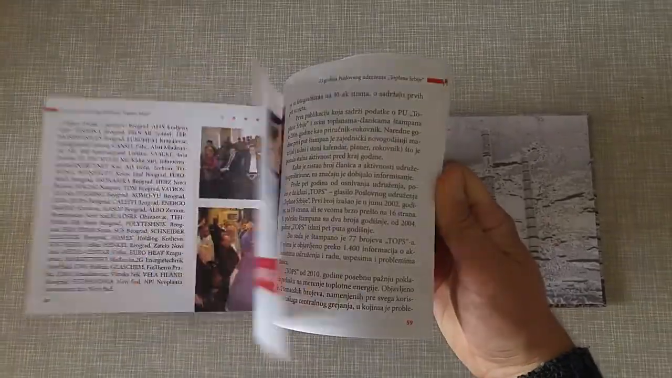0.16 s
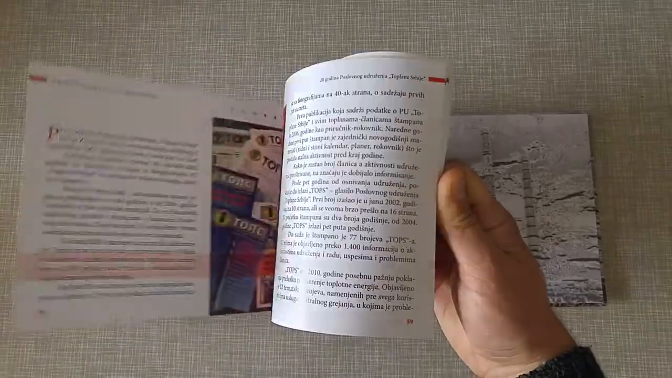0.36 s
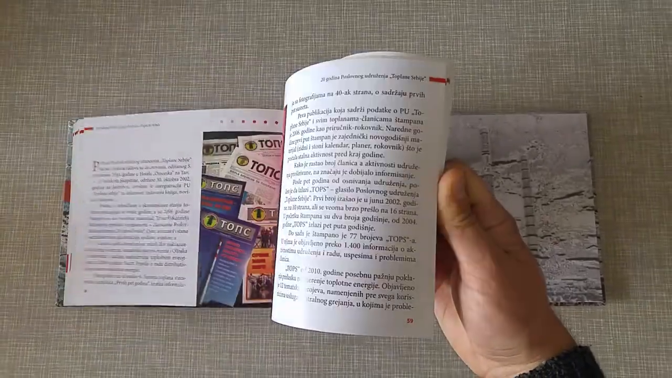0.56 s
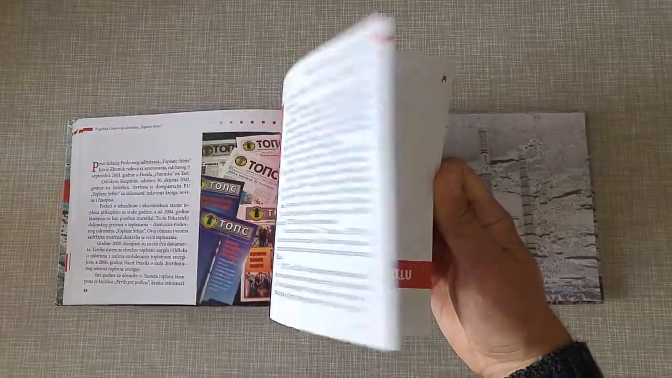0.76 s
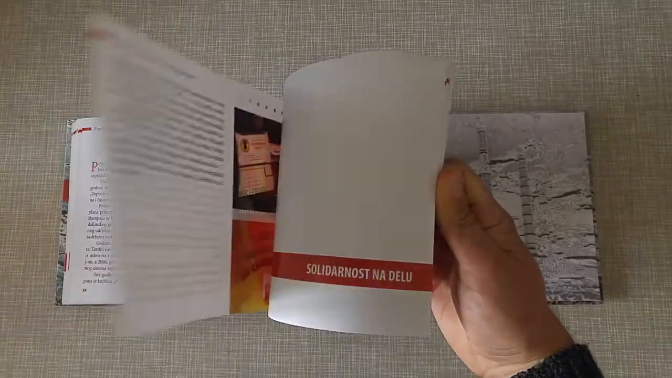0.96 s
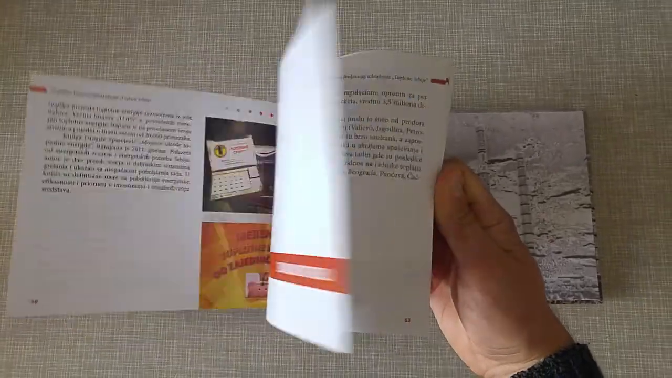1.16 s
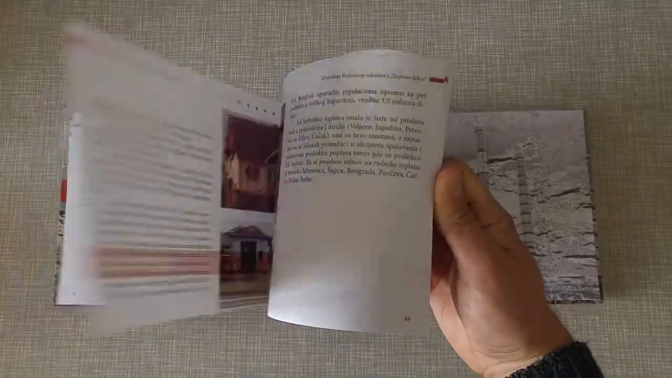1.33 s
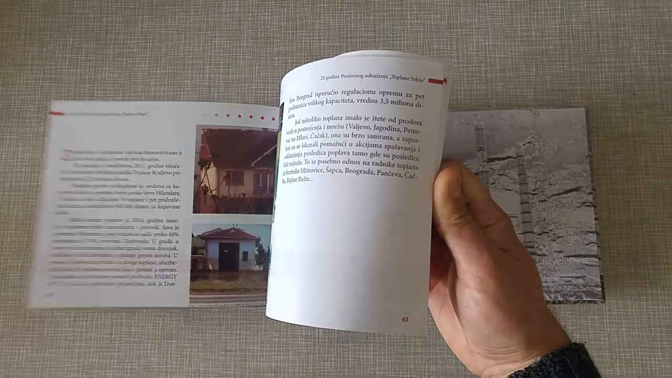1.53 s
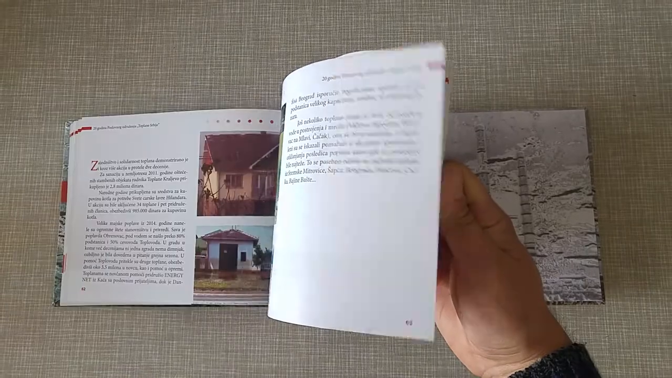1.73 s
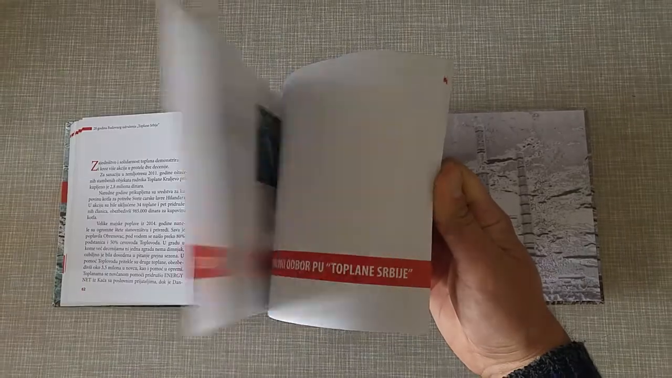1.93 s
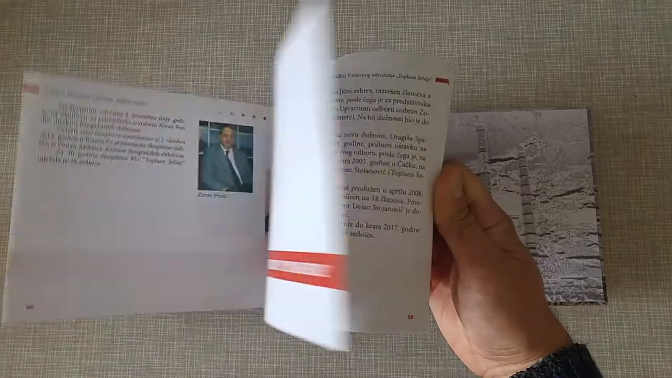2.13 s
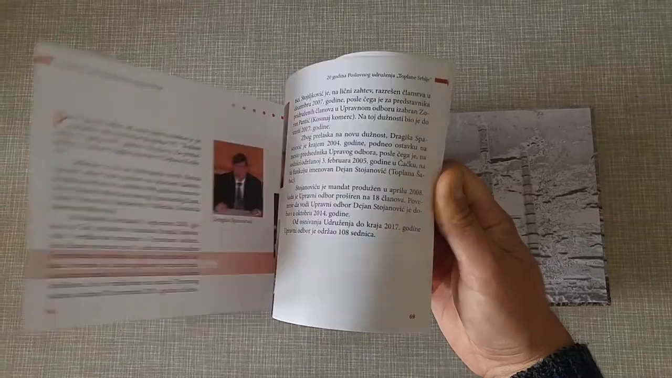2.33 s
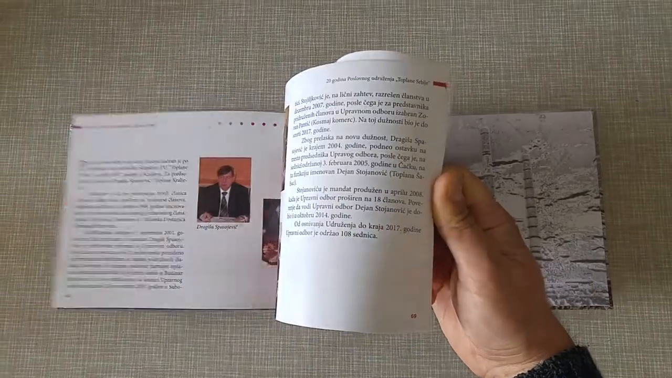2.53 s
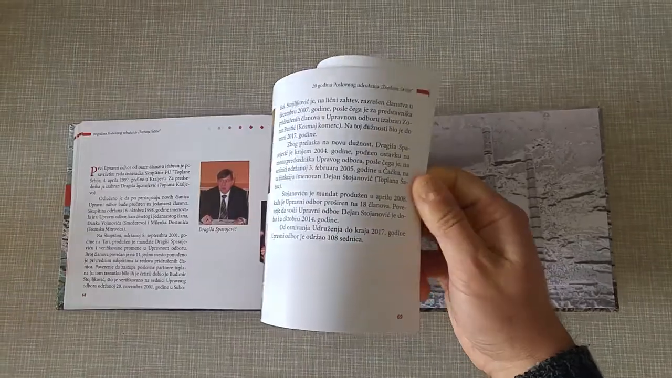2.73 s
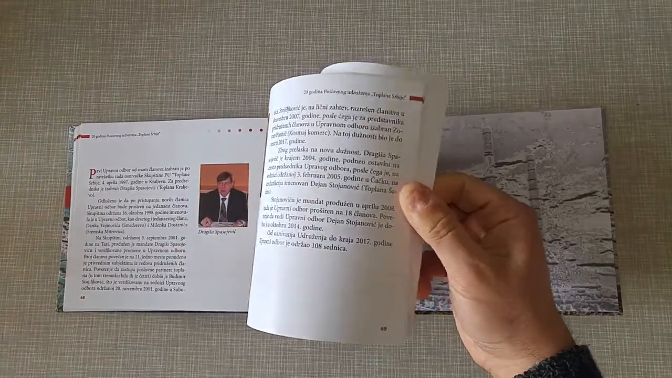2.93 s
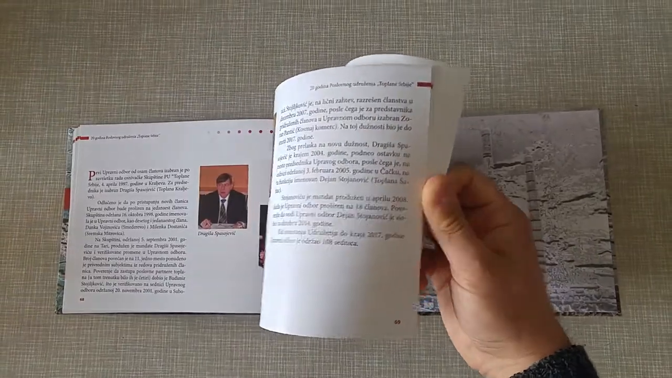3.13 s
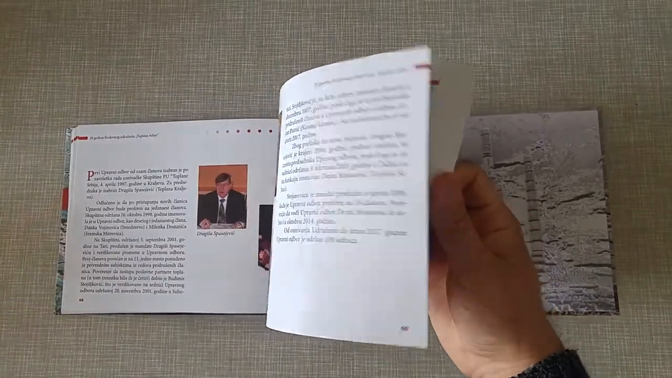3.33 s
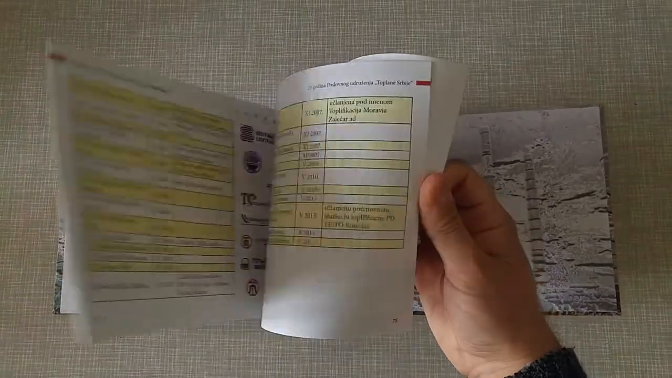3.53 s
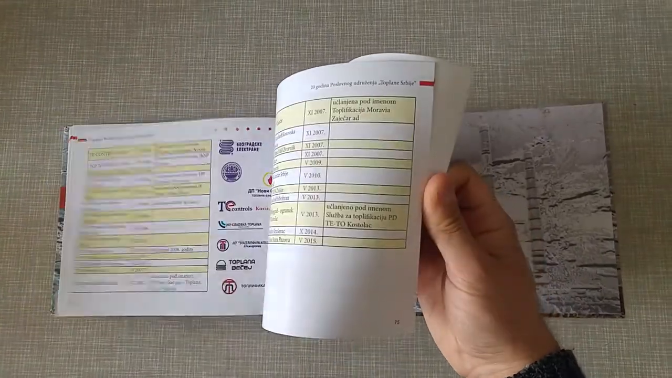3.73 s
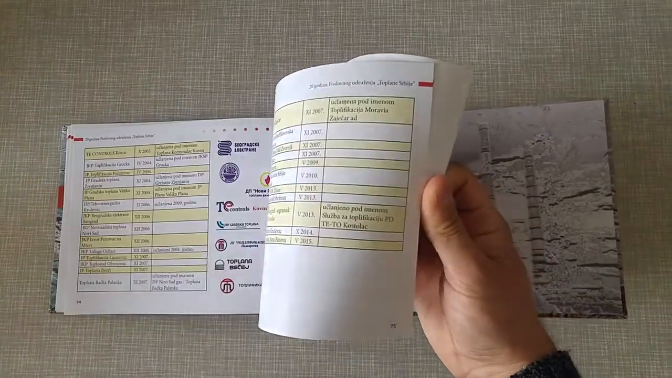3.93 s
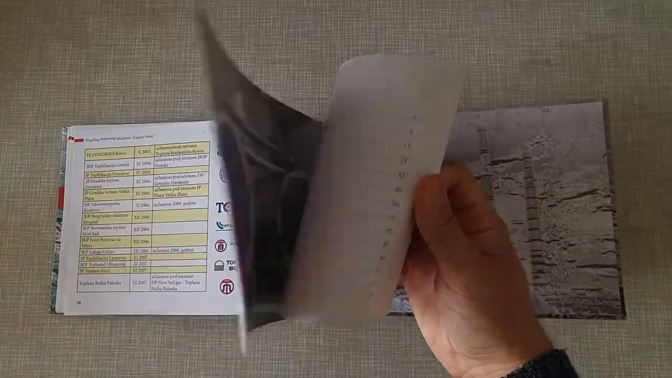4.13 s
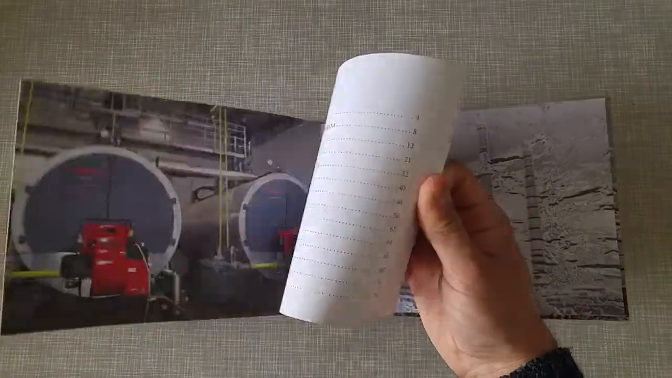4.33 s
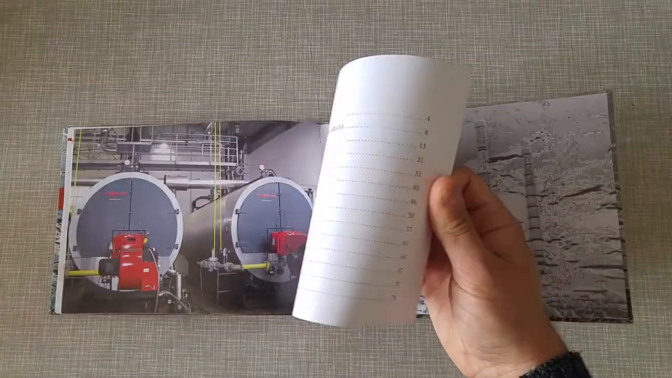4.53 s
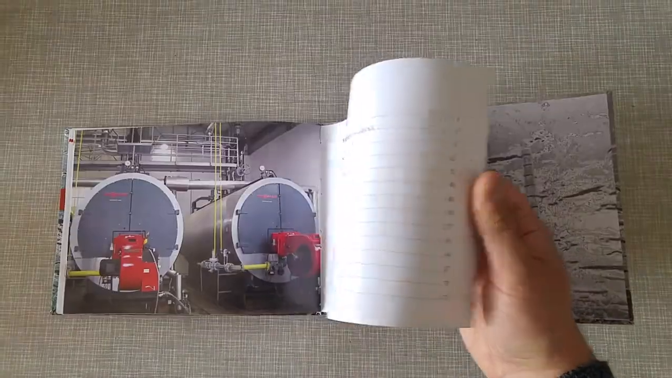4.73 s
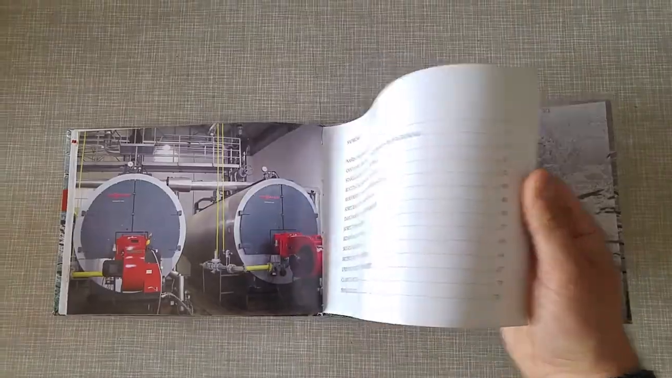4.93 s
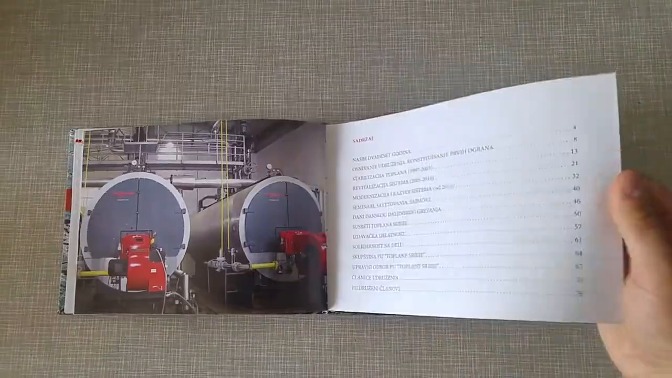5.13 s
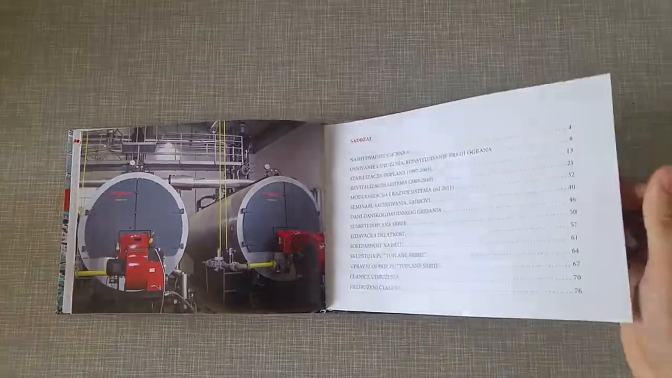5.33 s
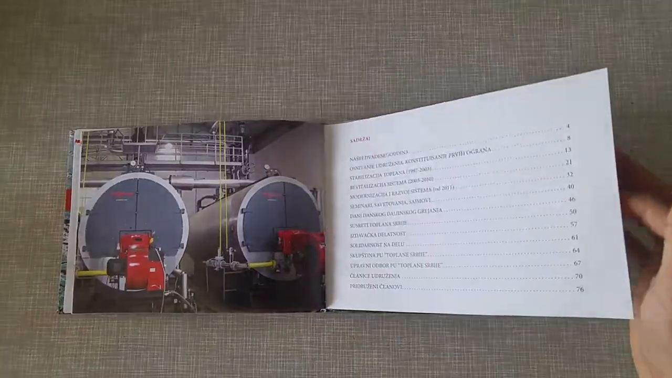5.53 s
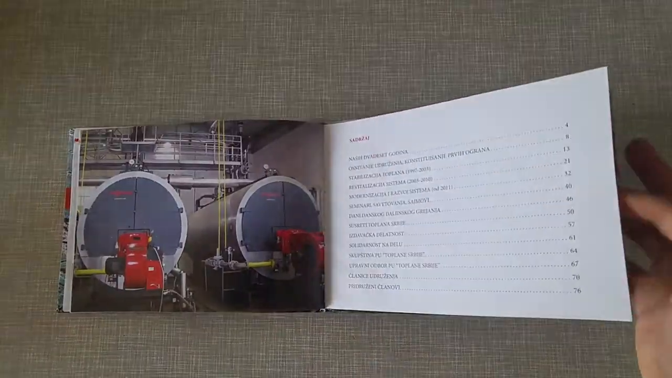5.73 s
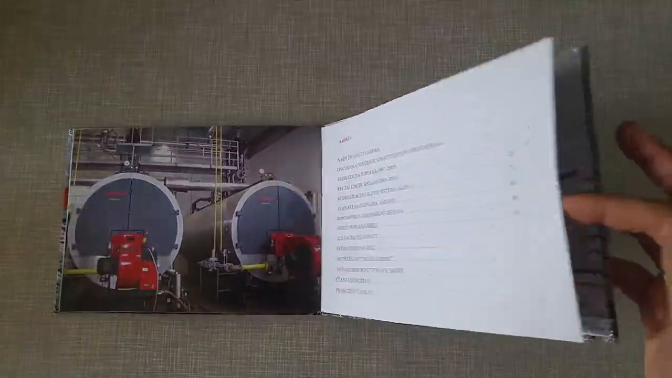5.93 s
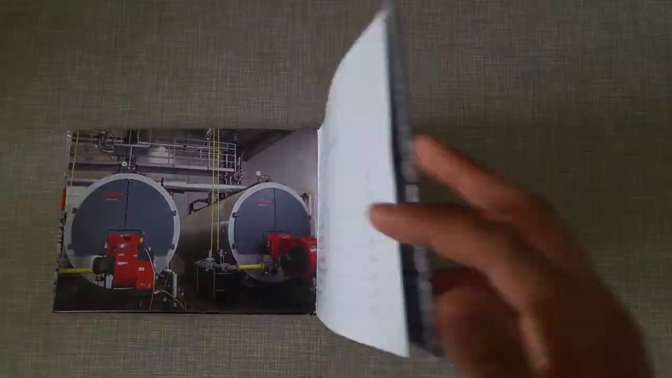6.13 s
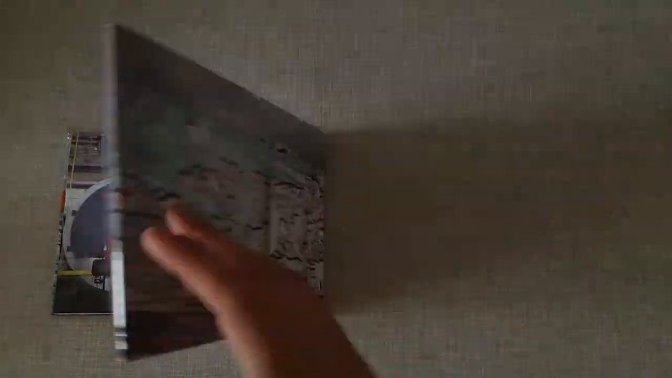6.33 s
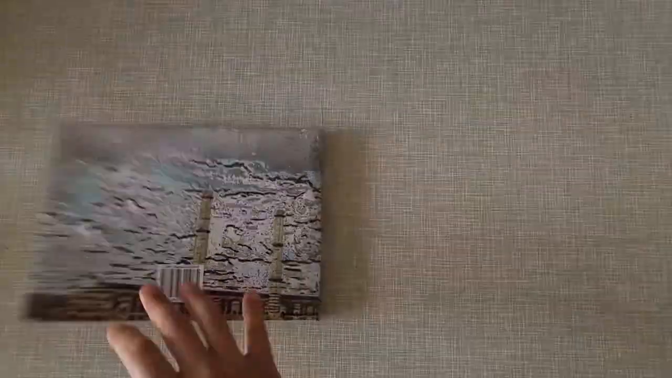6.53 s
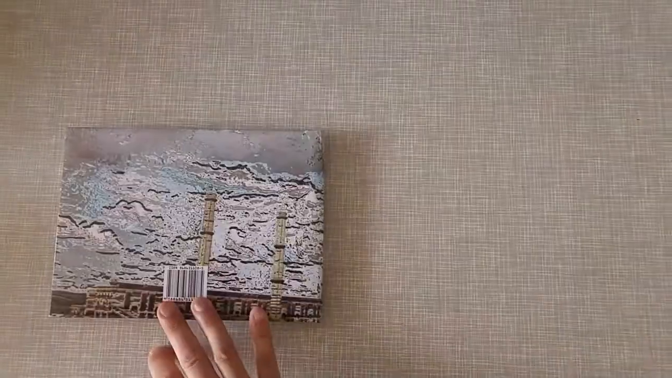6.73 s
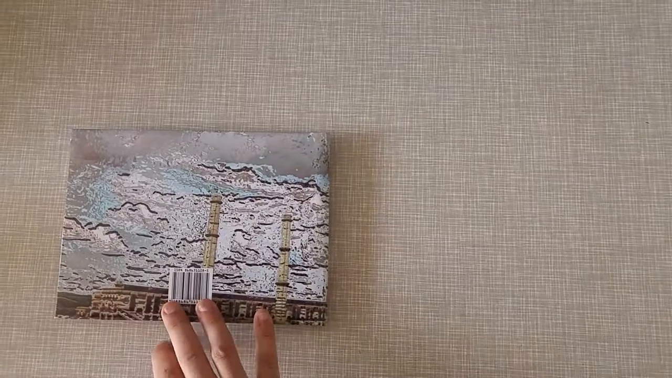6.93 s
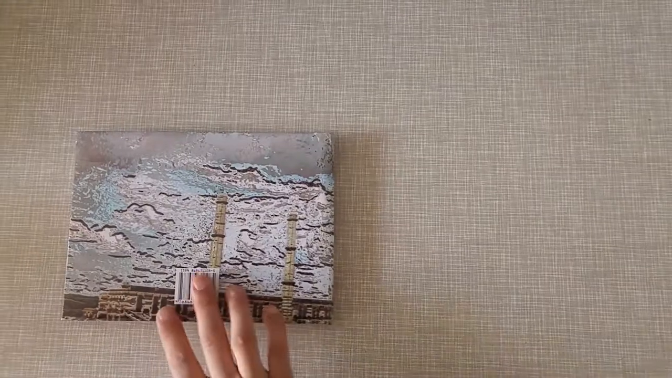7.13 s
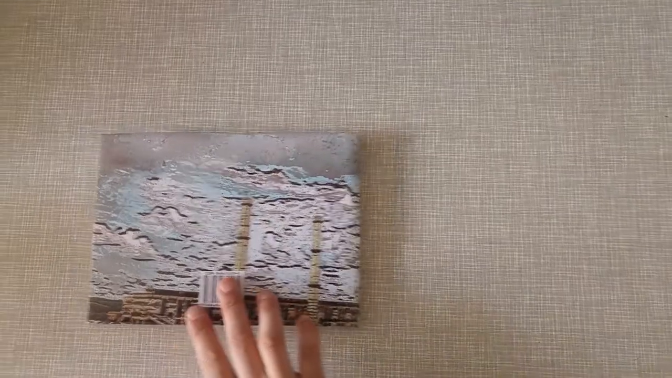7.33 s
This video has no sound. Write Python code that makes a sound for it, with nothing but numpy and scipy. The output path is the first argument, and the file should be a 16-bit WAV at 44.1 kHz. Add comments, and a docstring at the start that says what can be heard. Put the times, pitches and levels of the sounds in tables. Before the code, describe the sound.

A glossy paperback is thumbed through close by, pages hissing, snapping and popping, before its cover slaps shut with a low thud and fingers stroke it.

```python
"""In a small room, a glossy paperback is thumbed through close by on a cloth-covered table.
Page edges snap off the thumb as short noise bursts; buckling sheets pop as damped waves with cracks and flaps.
Grainy noise makes skin slide over paper, soft low noise makes the air waft, and low waves make dull knocks.
At the end the cover slaps shut, the book thuds with a ringing table, and fingers stroke the cover.
Room noise, a wavering hum and very faint ticks lie underneath."""
import sys
import numpy as np
from scipy import signal
from scipy.fft import rfft, irfft, next_fast_len
from scipy.io import wavfile
from scipy.ndimage import uniform_filter1d, map_coordinates

SR = 44100
rng = np.random.default_rng(int(sys.argv[2]) if len(sys.argv) > 2 else 0)


def dump(signal):
    """Clip the signal to [-1, 1] and save it as 16-bit WAV at the path in sys.argv[1]."""
    limited = np.clip(np.atleast_2d(signal).T, -1, 1)
    pcm = np.round(limited * 32767).astype(np.int16)
    wavfile.write(sys.argv[1], SR, pcm)


N = 328986  # length in samples

# Page edges snapping off the thumb: t/s, sizzle level/dB, body level/dB relative to sizzle, fall time/s
PAGE_SNAPS = [(.047, -30, -26, 0.0011), (.726, -32, -20, 0.0024), (1.056, -48.5, 3.5, 0.0021),
              (1.086, -27, -17, 0.0012), (1.117, -44, 20, 0.00096), (1.42, -37.5, 3.5, 0.0014),
              (1.4642, -43, 23, 0.00087), (1.6453, -45.5, 2, 0.0011), (1.745, -44, 3, 0.0012),
              (1.751, -33, -18, 0.0026), (1.788, -54, 11.5, 0.0023), (1.8006, -43.5, -10, 0.0016),
              (1.8084, -34.5, -21, .003), (2.0645, -31.5, -10, .003), (2.932, -39, -16, .004),
              (3.346, -32, -2.5, 0.0027), (3.3547, -29, -12.5, 0.0021), (3.6554, -52, -0.5, .001),
              (3.793, -44.5, 2, 0.0037), (3.8853, -51.5, 4.5, 0.0046), (4.01, -22, -8, .0035),
              (4.0906, -37, -13, 0.0037), (4.2915, -44.5, -21, .0008), (4.4972, -42.5, -1, 0.0038),
              (4.6173, -48.5, -11, 0.00092), (4.692, -35.5, -10.5, 0.0052), (5.2375, -41, 1, .005),
              (5.4196, -47, 1.5, 0.004)]
# Ticks, slap and taps of the stiff cover:
# t/s, sizzle level/dB, body level/dB and air level/dB relative to sizzle, fall time/s
COVER_TAPS = [(5.7705, -46, -3.5, -4.5, 0.0012), (5.815, -44, -30, 6, 0.00054),
              (5.8218, -45.5, -6, 6, 0.0012), (5.8706, -45, -17, 3.5, 0.00084),
              (5.9482, -47.5, -7, 0.5, .0009), (6.0725, -50.5, -7.5, 8, .0008),
              (6.2288, -44, -15, -12.5, .0025), (6.3162, -53.5, -9, 11, 0.0009),
              (6.5013, -48, -25, -3, .0007), (6.5723, -19.5, -26, -13.5, 0.00069),
              (6.6162, -26.5, -36, -12, 0.0014), (6.6216, -33, -22, -4, .0012),
              (7.1165, -41.5, -15, -9, .0009), (7.1565, -44.5, -11, -11.5, .0025)]
# Tone colours of the four parts of a snap: f/Hz, relative level/dB (per Hz)
SIZZLE_COLOUR = [(4000, -21), (5500, -10), (6400, -2), (7200, -1.5), (7900, -26), (10000, -38)]
BODY_COLOUR = [(100, -27.5), (350, -15.5), (500, -20.5), (750, 1.5), (1100, -2.5), (1650, -3.5),
               (2050, -10.5), (2700, -7.5), (4000, -49.5)]
RASP_COLOUR = [(2200, -35), (2950, 2), (3600, 2), (4200, 4), (4900, 7), (5600, 2), (7000, -36.5)]
AIR_COLOUR = [(6500, -30.5), (8400, -3), (10000, -13), (12000, -14), (16000, -22)]
# Part levels are relative to the sizzle; a positive lean is louder on the left
PAGE_RASP_DB, RASP_PER_BODY = -6.5, 0.7  # a fuller page snap also rasps more
PAGE_AIR_DB, PAGE_LEAN_DB = -9, 9.5
COVER_RASP_DB, COVER_LEAN_DB = -1, 11.5
RISE_SHARE = 0.66  # rise time of a snap over its fall time

# Sheets buckling, and in the last row (6.5725 s) the cover slapping shut: t/s, wave peak level/dB, pitch f/Hz,
# crack level/dB and flap level/dB relative to the wave
POPS = [(.061, -40, 902, -8, 10), (.2548, -46, 3180, -10, -20), (0.286, -47.5, 2800, -4, -20),
        (.3127, -41, 1630, -10, -2), (.383, -44.5, 940, -9, 11), (1.062, -35.5, 1100, -13, 4.5),
        (1.076, -37, 750, -20.5, 1), (1.1122, -27.5, 980, -12, -5), (1.1173, -21.5, 810, -5, -6.5),
        (1.268, -36, 900, -9, -23), (1.4655, -12.5, 1250, -1.5, -22.5), (1.4661, -11, 1660, -1, -26),
        (1.468, -21, 760, -12, -7.5), (2.159, -34, 860, -6.5, 6), (2.362, -44.5, 698, -39, -1),
        (3.2885, -15.5, 908, -18.5, -21.5), (3.604, -30, 803, -25, -6), (3.997, -32, 950, 6, 0.5),
        (4.1067, -24.5, 1200, -26, -3), (4.1266, -22.5, 980, -21, -3.5),
        (4.136, -21, 777, -28, -11.5), (4.52, -42, 402, -11, -7), (4.578, -39, 1012, -8, -21),
        (4.693, -33, 932, -18, -5), (4.855, -42.5, 1010, -9, 0), (5.5876, -46.5, 762, 1.5, 9),
        (6.189, -42, 1600, -2, -9), (6.21, -43, 1480, -5, -20.5), (6.231, -41, 1670, -10, -8),
        (6.5725, -24.5, 1360, -13, -34)]
# Tone colours of the crack and the flap: f/Hz, relative level/dB (per Hz)
CRACK_COLOUR = [(250, -51), (700, -13), (1200, 2.5), (1850, 9.5), (2400, -2), (3300, 2.5), (4400, -13.5),
                (6800, -14), (8000, -37), (16000, -45)]
FLAP_COLOUR = [(120, -20.5), (250, -11.5), (390, 6), (500, -15), (680, 3.5), (1000, -4), (1400, -14.5),
               (2500, -43)]
POP_CYCLES, POP_LEAN_DB = 2.2, 9.5  # a pop swells over this many cycles of its pitch
# Room level at the middle pitch, and its change per octave: low buckles light up the room more
POP_ROOM_DB, POP_ROOM_DB_PER_OCTAVE, POP_MIDDLE_HZ = -6, -5.5, 1000

# Skin and paper sliding: t/s at full speed, hold/s, hiss level/dB before the trim in sliding(),
# hollow body level/dB relative to that hiss, attack/s, release/s
SLIDING_STROKES = [(0.049, .01, -49.5, -5, 0.0205, 0.031), (0.363, .01, -55.5, -3, 0.016, 0.045),
                   (0.64, 0.0051, -44, -11.5, 0.0075, .022), (0.702, 0.03, -58, -13.5, .03, 0.062),
                   (1.087, 0.026, -45.5, -10.5, 0.021, .14), (1.442, 0.016, -45, -8.5, 0.058, .1),
                   (1.685, 0.15, -50.5, -16.5, 0.047, .05), (2.054, 0.013, -35, -5, 0.0096, 0.0068),
                   (2.555, 0.066, -37, -7.5, 0.018, .055), (2.787, .008, -52.5, -4, 0.014, .02),
                   (2.873, 0.051, -28.5, -7.5, 0.00089, 0.027), (3.051, 0.011, -41, -5.5, 0.028, 0.068),
                   (3.148, 0.058, -41.5, -3.5, 0.043, .012), (3.24, 0.0086, -42.5, 0, 0.013, 0.026),
                   (3.352, .01, -41, -6.5, .018, .03), (3.439, 0.0047, -36, -11.5, .022, .02),
                   (3.73, 0.085, -52.5, -2, .03, .025), (4.004, 0.0041, -28, -6.5, 0.0096, 0.024),
                   (4.1, 0.0053, -35.5, -2.5, 0.016, 0.031), (4.531, 0.024, -43.5, -1, .022, .02),
                   (4.702, .004, -43, -2, .005, 0.038), (4.935, 0.069, -43.5, -4, 0.04, 0.028),
                   (5.042, .06, -43.5, -11.5, .025, 0.054), (5.178, 0.064, -38.5, -4, 0.0164, 0.013),
                   (5.304, .01, -51.5, 0, 0.03, 0.023), (5.376, 0.039, -47, -5, .01, 0.028),
                   (5.505, .025, -45.5, -5, 0.045, 0.052), (5.791, 0.12, -45.5, -8.5, 0.078, 0.12),
                   (6.071, 0.018, -40, -8.5, 0.016, .024), (6.243, 0.011, -50, -20, 0.061, 0.13),
                   (6.537, 0.0075, -39.5, -14, .028, 0.013), (6.572, .003, -25, -11.5, 0.0036, 0.015),
                   (6.604, .055, -37.5, -9, .008, 0.048), (7.04, 0.07, -39.5, -21.5, 0.005, .05),
                   (7.204, 0.009, -33.5, -17, .015, 0.043), (7.305, 0.046, -30.5, -22, 0.029, .04),
                   (7.391, 0.08, -25.5, -23.5, 0.056, .05)]
# Tone colours of page hiss, cover hiss and the hollow sheet: f/Hz, relative level/dB (per Hz)
PAGE_COLOUR = [(1500, -35), (2200, -14), (2900, -8), (3500, -8.5), (4100, -7.5), (5200, -6), (6200, -3.5),
               (7250, -1.5), (8000, -10), (9400, -11), (12500, -18.5), (16000, -16.5)]
COVER_COLOUR = [(1180, -34), (2000, -19.5), (2760, -14), (3260, -11.5), (3550, -8), (4080, -11.5),
                (4690, -3.5), (5930, -4.5), (7060, 0.5), (7910, -9), (8780, -8), (12300, -17.5),
                (14800, -11), (16000, -31.5)]
SHEET_COLOUR = [(150, -22.5), (370, -4.5), (500, -26), (650, 0), (820, -1.5), (1030, 1), (1270, -4),
                (1780, -4), (2020, -6.5), (2600, -10), (3500, -34.5)]
# Resonances of the curled page: f/Hz, width/Hz, level/dB
CURL_RESONANCES = [(1035, 210, -1.5), (1445, 120, -9.5), (1703, 230, 3.5), (2906, 120, 2.5),
                   (3996, 180, -5.5), (6150, 840, -6)]
# Faint hiss and hollow body of pages held under tension, before the trims in sliding()
GRIP_DB, GRIP_BODY_DB = -65, -68.5

# Ringing of the table: f/Hz, level/dB, time to fall by 60 dB/s, level change/dB under the book's weight
TABLE_RINGING = [(71.7, -17.5, 0.59, -24), (97.5, -24, 0.19, -14), (145.6, -33, 0.77, 6),
                 (176, -28, 0.19, -5.5), (221, -35, 0.24, 1), (73.3, -41, 1.56, 2.5)]
# Soft knocks of hand and book: t/s, peak level/dB, pitch f/Hz, swell/s
SOFT_KNOCKS = [(3.154, -39, 89, 0.0057), (3.404, -39, 109, 0.0072), (4.011, -39.5, 218, 0.0037),
               (4.502, -29.5, 186, 0.00094), (4.695, -38, 334, 0.0014), (5.053, -46, 69, 0.013),
               (5.774, -44.5, 84.6, 0.018), (5.846, -30.5, 210, 0.0019), (5.924, -38, 82, 0.0077),
               (6.0057, -30.5, 216, 0.0018), (6.04, -40, 69.6, 0.0072), (6.473, -39, 157, 0.017),
               (6.525, -39, 155, 0.006), (6.617, -25.5, 191, 0.0051), (7.067, -43, 202, 0.002)]
# Air pushed by a swinging sheet: t/s, peak level/dB, rise/s, fall/s
AIR_WAFTS = [(.205, -41, .035, 0.091), (.33, -50.5, 0.094, 0.1), (4.351, -42, 0.029, 0.058),
             (4.518, -52, 0.081, 0.02), (5.041, -44.5, .04, 0.039), (5.43, -54, 0.076, 0.33),
             (5.93, -50, 0.054, .05), (6.475, -43.5, 0.021, 0.059), (6.54, -51.5, 0.054, 0.033),
             (6.635, -43.5, 0.018, 0.085)]
# Tone colour of the moving air: f/Hz, relative level/dB (per Hz)
WAFT_COLOUR = [(50, -34), (110, 1), (190, 4.5), (300, -8.5), (400, -3), (500, -24), (680, -9.5),
               (1000, -34), (3000, -48)]
# Tone colour of the quiet room: f/Hz, relative level/dB (per Hz)
QUIET_COLOUR = [(15, -22.5), (25, -12.5), (137, -3), (270, -16.5), (301, -16), (384, -11.5), (516, -19.5),
                (863, -20), (1440, -38.5), (1840, -34), (2610, -26.5), (3080, -33), (3820, -24.5),
                (6560, -26.5), (16000, -35)]
# Tones of the hum: f/Hz, level/dB
HUM_TONES = [(43.1, -62.5), (123.8, -62.5), (247.6, -72)]

# Likeness of left and right: f/Hz, correlation (1 means identical)
SIDE_LIKENESS = [(30, 1), (80, 0.91), (700, 0.75), (2000, 0.078), (6000, 0.21), (14000, 0.26)]
# Fading of the room's echo: f/Hz, time to fall by 60 dB/s
ROOM_DECAY = [(100, 0.39), (500, 0.43), (1400, 0.28), (4000, 0.33), (8000, 0.264), (16000, 0.087)]
# Difference of the two microphone ports: f/Hz, left minus right level/dB
PORT_DIFFERENCE = [(100, 1), (280, -2.5), (600, -3), (1100, -2.5), (2200, 1.5), (4500, -1.5), (8000, -3),
                   (13000, -4)]
TOP_HZ = 16200  # nothing is heard above this


def snaps(room_db=-10, body_room_db=-6):
    """An edge scrapes over the thumb and flicks free: a burst of a few ms, answered by the room."""
    out, size = np.zeros((2, N)), SR // 16
    t = (np.arange(size) - size // 2) / SR
    span = SR // 100  # a burst's level is its average over 10 ms
    for s, db, body_db, rasp_db, air_db, rise, fall, lean_db in edges():
        swell = np.exp(-np.abs(t) / np.where(t < 0, rise, fall))

        def burst(colour):
            """Coloured noise that rises and falls like the flick."""
            return unit(swell * noise(colour, size)) * np.sqrt(span / size) * amp(db)

        edge = burst(SIZZLE_COLOUR)
        edge = edge + amp(rasp_db) * burst(RASP_COLOUR)
        edge = edge + amp(air_db) * burst(AIR_COLOUR)
        body = amp(body_db) * burst(BODY_COLOUR)
        echo = room(amp(room_db) * edge + amp(body_room_db) * body)
        add(out, s + t[0], (edge + body) * pan(lean_db))
        add(out, s + t[0], echo * pan(lean_db / 2))
    return out


def edges():
    """Pages and the stiff cover snap alike: list time, four part levels, rise, fall and lean for both."""
    events = []
    for s, db, body_db, fall in PAGE_SNAPS:
        rasp_db = PAGE_RASP_DB + RASP_PER_BODY * body_db
        events.append((s, db, body_db, rasp_db, PAGE_AIR_DB, RISE_SHARE * fall, fall, PAGE_LEAN_DB))
    for s, db, body_db, air_db, fall in COVER_TAPS:
        events.append((s, db, body_db, COVER_RASP_DB, air_db, RISE_SHARE * fall, fall, COVER_LEAN_DB))
    return events


def pops(room_lean_db=6, flap_swell=0.0055):
    """A bent sheet flips its curve with a hollow pop and a crack, then flaps; the shutting cover slaps with the
    same kind of wave; the room lights up."""
    out, size = np.zeros((2, N)), SR // 20
    for s, db, hz, crack_db, flap_db in POPS:
        swell = POP_CYCLES / hz
        room_db = POP_ROOM_DB + POP_ROOM_DB_PER_OCTAVE * np.log2(hz / POP_MIDDLE_HZ)
        envelope, wave = flex(hz, swell, size)
        flap_envelope = flex(hz, flap_swell, size)[0]
        crack = amp(crack_db) * unit(envelope * noise(CRACK_COLOUR, size))
        flap = amp(flap_db) * unit(flap_envelope * noise(FLAP_COLOUR, size))
        pop = amp(db) * (wave + np.std(wave) * (crack + flap))
        add(out, s - swell, pop * pan(POP_LEAN_DB))
        add(out, s - swell, amp(room_db) * room(pop) * pan(room_lean_db))
    return out


def flex(hz, swell, size):
    """A few cycles of a damped surface: the envelope, peaking after swell seconds, and the wave."""
    t = np.arange(size) / SR
    envelope = (t / swell * np.exp(1 - t / swell)) ** 2
    return envelope, envelope * np.sin(2 * np.pi * hz * (t - swell))


def sliding(hiss_db=-2.5, flat_db=0.5, grain_db=0.5, cover_grain_db=0.5, room_db=-11):
    """Tiny slips make a grainy hiss; loose pages add a hollow body and crinkle, the cover is smoother."""
    t = clock()
    last_sheet, shut = 4.8, 6.5  # s: the last sheet unrolls, the cover takes over the hiss
    hiss, body = strokes(t)
    creases = crinkle(np.where(t > last_sheet, 200, 40), strength=1.4)
    pressure_db = 1.2 * wobble(60)
    slips = unit(amp(grain_db * wobble(900) + pressure_db) * creases)

    def sheet(x):
        """The last sheet unrolls and loses the curl's ring."""
        return np.where(t < last_sheet, curled(x), amp(flat_db) * x) * pan(9.0)

    page = bending(sheet(slips * noise(PAGE_COLOUR, N)), patchy_db=4.0)
    hollow = bending(sheet(slips * noise(SHEET_COLOUR, N)), patchy_db=2.5)
    cover_grain = amp(cover_grain_db * wobble(700))
    cover = bending(cover_grain * noise(COVER_COLOUR, N), patchy_db=0.6) * pan(10)
    rub = amp(hiss_db) * hiss * np.where(t < shut, page, cover) + body * hollow
    return rub + amp(room_db) * room(rub)[:, :N]


def strokes(t):
    """Gains of hiss and hollow body: each stroke gathers speed, holds it and dies away."""
    hiss_power, body_power = amp(GRIP_DB) ** 2, amp(GRIP_BODY_DB) ** 2
    for s, hold, db, body_db, attack, release in SLIDING_STROKES:
        before = np.maximum((s - t) / attack, 0)
        after = np.maximum((t - s - hold) / release, 0)
        power = amp(db) ** 2 * np.exp(-2 * np.minimum(before + after, 20))
        hiss_power = hiss_power + power
        body_power = body_power + amp(body_db) ** 2 * power
    return np.sqrt(hiss_power), np.sqrt(body_power)


def curled(x):
    """The curled page rings in narrow hollow bands, added to the plain rustle."""
    size = next_fast_len(N + SR // 8)
    f = np.fft.rfftfreq(size, 1 / SR)
    bands = 0
    for hz, width, db in CURL_RESONANCES:
        bands = bands + amp(db) * 1j * f * width / (hz ** 2 - f ** 2 + 1j * f * width)
    return unit(irfft(rfft(x, size) * (1 + bands), size)[:, :N])


def crinkle(rate, strength, life=0.00088):
    """Gain jumps whenever a crease gives way, on average rate times a second, and sinks back in life/s."""
    jumps = (rng.random(N) < rate / SR) * rng.uniform(0.3, 1, N)
    return 1 + strength * signal.lfilter([1], [1, -np.exp(-1 / (life * SR))], jumps)


def bending(x, patchy_db):
    """As a sheet bends, bands of its rustle swell and fade on their own."""
    z = signal.stft(x, nperseg=512)[2]
    field = rng.standard_normal(z.shape[1:])
    field = uniform_filter1d(field, size=4, axis=0)  # across pitch
    field = uniform_filter1d(field, size=14, axis=1)  # across time
    return unit(signal.istft(z * amp(patchy_db * unit(field)), nperseg=512)[1][:, :N])


def thud(s=6.592, cushion=0.021, settle=0.2):
    """The book lands on a cushion of air and rings the table, until its settling weight changes the ring."""
    t = np.maximum(clock() - s, 0)
    press = 1 - np.exp(-(t / cushion) ** 2)
    weight = 1 - np.exp(-(t / settle) ** 4 / 2)
    ringing = 0
    for hz, db, t60, weight_db in TABLE_RINGING:
        level_db = db - 60 * t / t60 + weight * weight_db
        ringing = ringing + amp(level_db) * np.sin(2 * np.pi * hz * t)
    return press * ringing


def knocks(room_db=-9):
    """Hand and book bump dully against the cloth: a few low, damped cycles."""
    out = np.zeros((2, N))
    for s, db, hz, swell in SOFT_KNOCKS:
        bump = amp(db) * flex(hz, swell, SR // 8)[1] * pan(0)
        add(out, s - swell, bump)
        add(out, s - swell, amp(room_db) * room(bump))
    return out


def wafts():
    """Each swinging sheet pushes a soft breeze of low noise."""
    t, power = clock(), 0
    for s, db, rise, fall in AIR_WAFTS:
        swell = np.exp(-((t - s) / np.where(t < s, rise, fall)) ** 2)
        power = power + (amp(db) * swell) ** 2
    return np.sqrt(power) * noise(WAFT_COLOUR, N)


def background(floor_db=-56):
    """Steady room noise with a faint hum, whose tones waver by randomly shifted phases."""
    hum = 0
    for hz, db in HUM_TONES:
        phase = 2 * np.pi * hz * clock() + 0.91 * wobble(5)
        hum = hum + amp(db) * np.sqrt(2) * np.sin(phase)
    return amp(floor_db) * noise(QUIET_COLOUR, N) + hum


def ticks(db=-48, spread_db=4):
    """Very faint electrical ticks, short bursts of high noise, recur about ten times a second."""
    out, size = np.zeros((2, N)), SR // 600
    times = np.arange(0.0575, N / SR, 0.1024)
    for s, scatter in zip(times, rng.uniform(-3, 1, len(times))):
        add(out, s, amp(db + spread_db * scatter) * np.hanning(size) * noise(AIR_COLOUR, size))
    return out


def room(x, gap=0.0022):
    """The room's answer: noise dying at its own pace in each band, drawn anew for every call."""
    hz, t, z = signal.stft(rng.standard_normal((2, SR // 2)), SR, nperseg=256)
    decay = amp(-60 * t / along(ROOM_DECAY, hz)[:, None])
    tail = signal.istft(z * decay, SR, nperseg=256)[1]
    size = tail.shape[1]
    # silent for one gap, then fading in over another
    tail *= np.clip(np.arange(size) / SR / gap - 1, 0, 1)
    # the two ports hear long waves alike
    likeness = np.clip(along(SIDE_LIKENESS, np.fft.rfftfreq(size, 1 / SR)), 0, 1) ** 2
    tail = stereo(rfft(tail), likeness, size)
    return signal.fftconvolve(x.mean(0)[None], tail / np.linalg.norm(tail[0]), axes=1)


def noise(colour, size):
    """Coloured stereo noise of average strength (rms) 1, nearly mono in the bass."""
    full = next_fast_len(size)
    hz = np.fft.rfftfreq(full, 1 / SR)
    coloured = rfft(rng.standard_normal((2, full))) * amp(along(colour, hz))
    likeness = np.clip(along(SIDE_LIKENESS, hz), 0, 1)
    return unit(stereo(coloured, likeness, full)[:, :size])


def stereo(spectra, likeness, size):
    """Mix two independent spectra as middle and side, so that left and right are this much alike."""
    turn = np.arccos(likeness) / 2
    mid, side = irfft(spectra * [np.cos(turn), np.sin(turn)], size)
    return np.array([mid + side, mid - side])


def amp(db):
    """Turn decibels into a plain gain."""
    return 10 ** (np.asarray(db) / 20)


def unit(x):
    """Scale a sound to an average strength (rms) of 1."""
    return x / np.sqrt(np.mean(x ** 2) + 1e-20)


def along(points, hz):
    """Read a curve of (f/Hz, value) points at any frequency, on a log axis."""
    f, v = np.transpose(points)
    return np.interp(np.log(hz + 1), np.log(f + 1), v)


def clock():
    """The time of every sample in seconds."""
    return np.arange(N) / SR


def wobble(rate):
    """A random curve: straight lines joining rate random points a second."""
    knots = rng.standard_normal(int(N * rate / SR) + 4)
    return map_coordinates(knots, [np.arange(N) * rate / SR], order=1)


def pan(lean_db):
    """Left and right gains whose mean is 1; positive leans left."""
    gains = amp([[lean_db / 2], [-lean_db / 2]])
    return gains / gains.mean()


def add(track, s, sound):
    """Mix a stereo sound into the track from time s on, cutting what falls outside."""
    start = round(s * SR)
    part = sound[:, max(-start, 0):max(N - start, 0)]
    track[:, max(start, 0):][:, :part.shape[1]] += part


def scene():
    """All sounds of the book, the hand and the room together."""
    book = snaps() + pops() + sliding() + thud()
    return book + knocks() + wafts() + background() + ticks()


def record(dry, notch_hz=500, notch_width_hz=90, notch_depth=0.81, low_cut_hz=39, lag=0.00002):
    """Two slightly different microphone ports, a low-mid dip, a bass cut, soft overload and a top limit."""
    size = next_fast_len(N + SR // 4)
    hz = np.fft.rfftfreq(size, 1 / SR)
    band = 1j * hz * notch_width_hz
    dip = 1 - notch_depth * band / (notch_hz ** 2 - hz ** 2 + band)
    bass_cut = signal.freqs(*signal.butter(4, low_cut_hz, "high", analog=True), hz)[1]
    sides = np.array([[1], [-1]]) / 2
    # the left port hears everything lag seconds after the right
    ports = amp(sides * along(PORT_DIFFERENCE, hz)) * np.exp(-2j * np.pi * hz * lag * sides)
    heard = irfft(rfft(dry, size) * ports * dip * bass_cut, size)
    rounded = heard / (1 + (heard / 0.85) ** 6) ** (1 / 6)  # peaks bend over below 0.85
    return irfft(rfft(rounded) * (hz < TOP_HZ), size)[:, :N]


dry = scene()
out = record(dry)
dump(out)
```